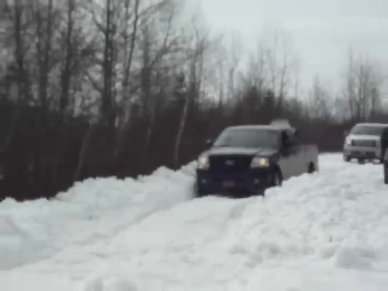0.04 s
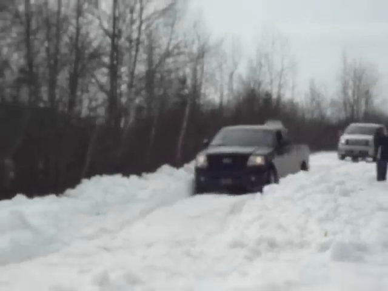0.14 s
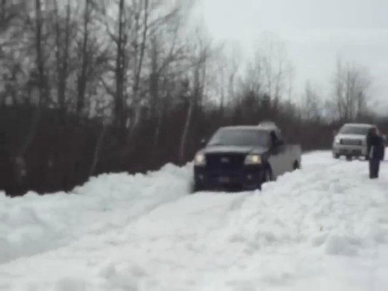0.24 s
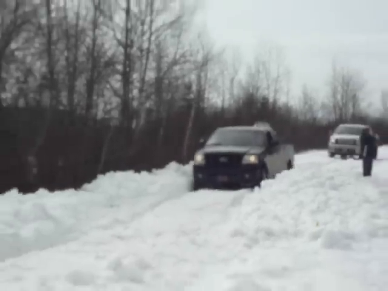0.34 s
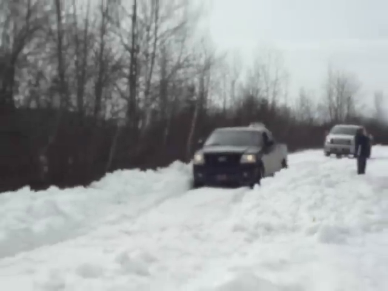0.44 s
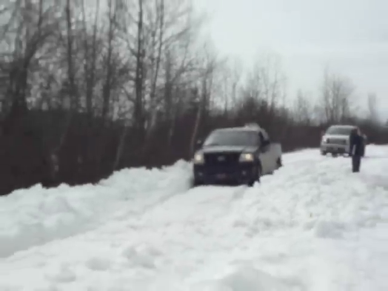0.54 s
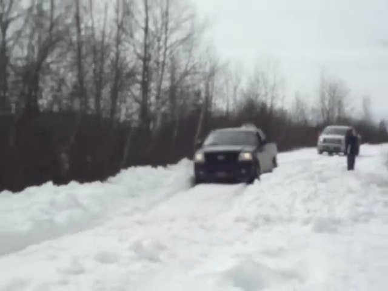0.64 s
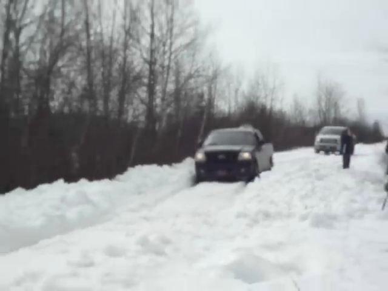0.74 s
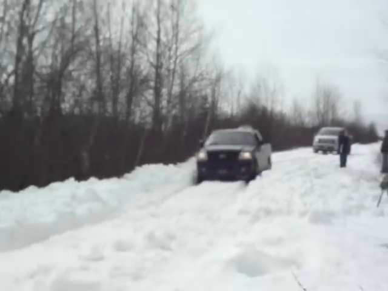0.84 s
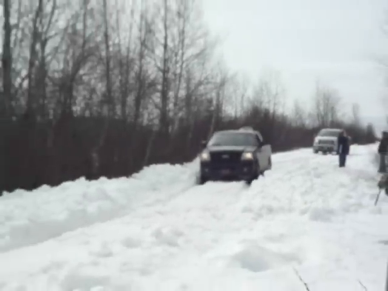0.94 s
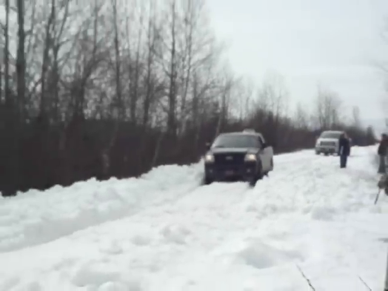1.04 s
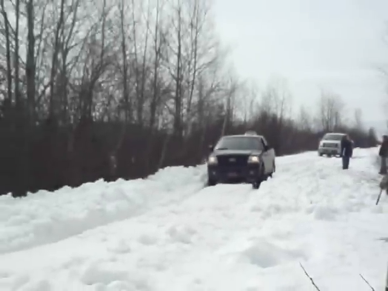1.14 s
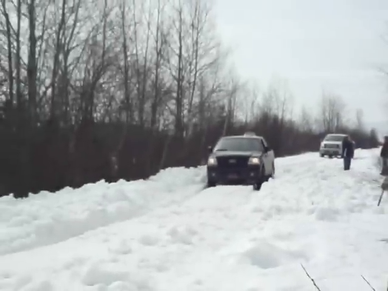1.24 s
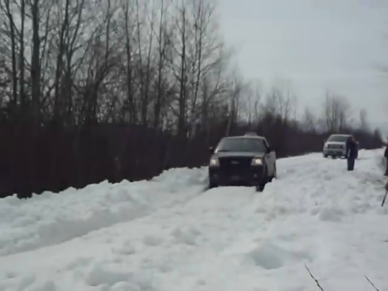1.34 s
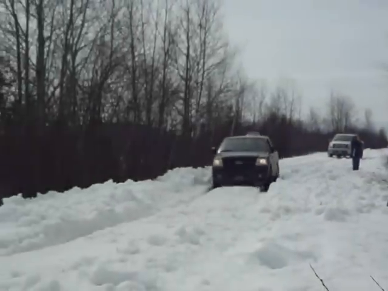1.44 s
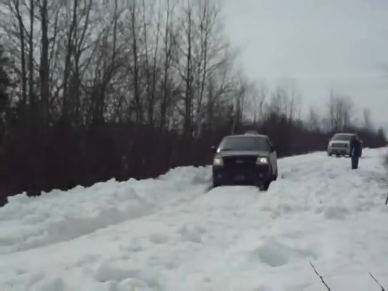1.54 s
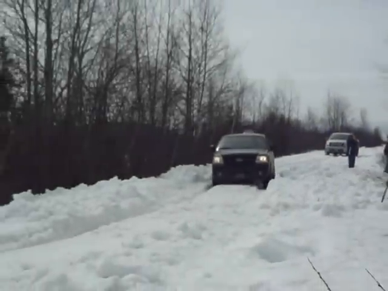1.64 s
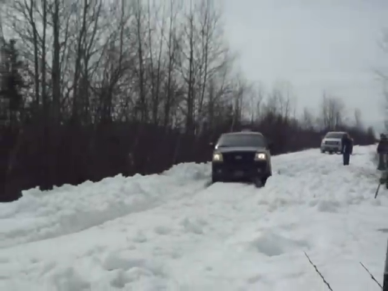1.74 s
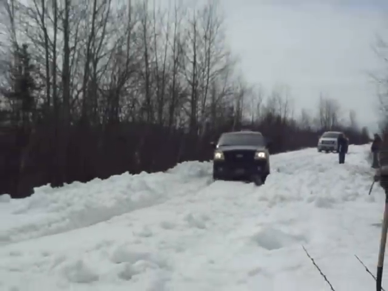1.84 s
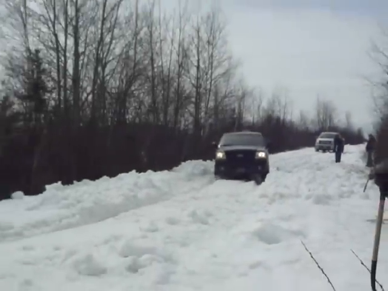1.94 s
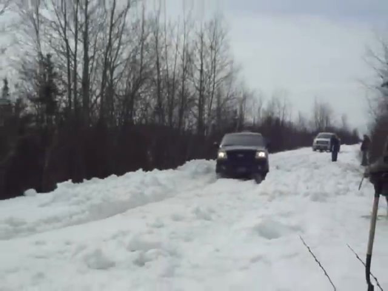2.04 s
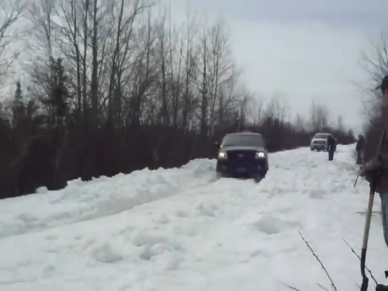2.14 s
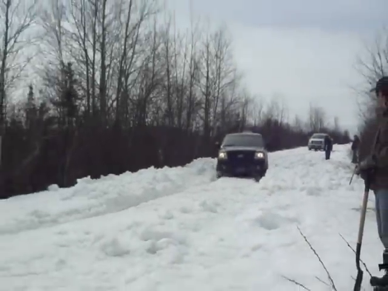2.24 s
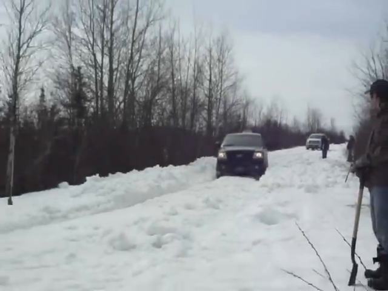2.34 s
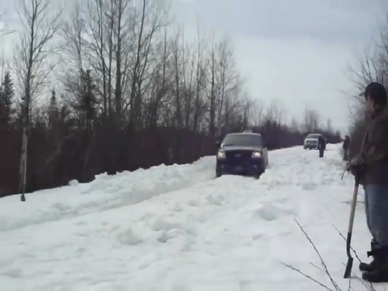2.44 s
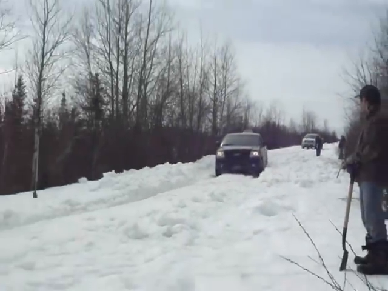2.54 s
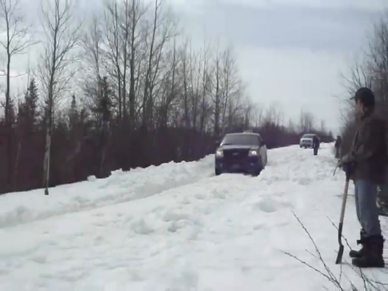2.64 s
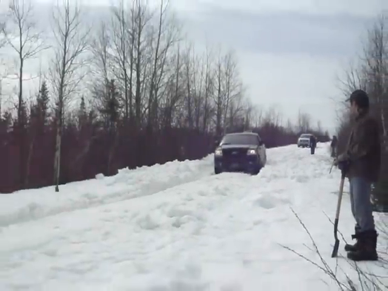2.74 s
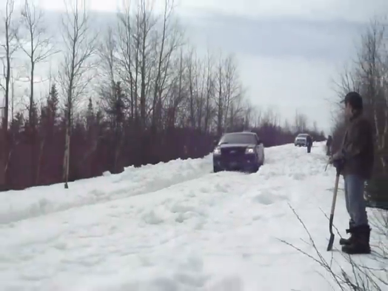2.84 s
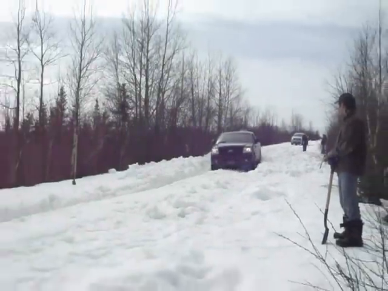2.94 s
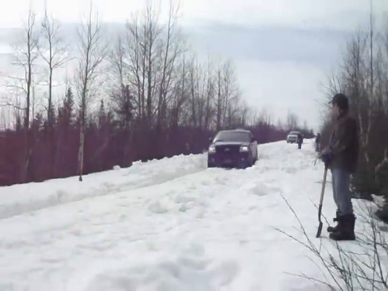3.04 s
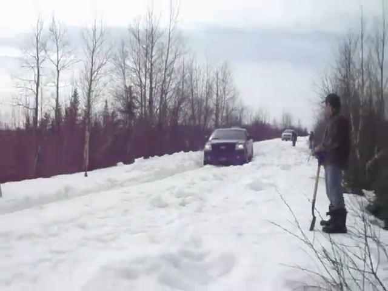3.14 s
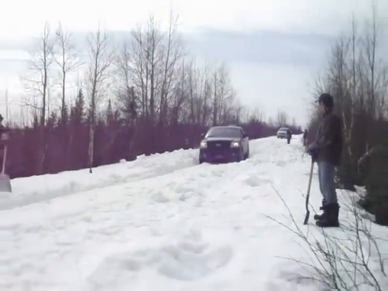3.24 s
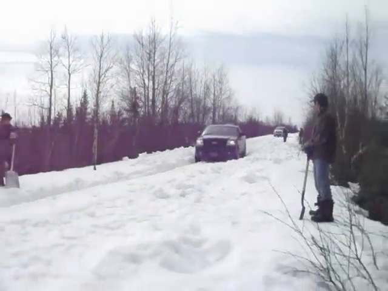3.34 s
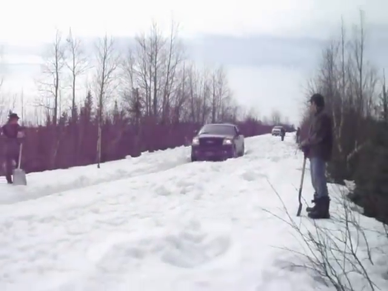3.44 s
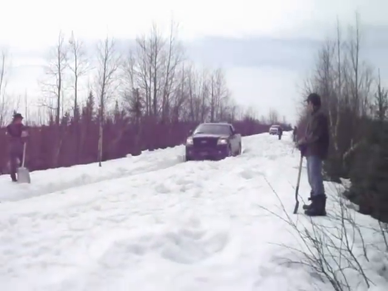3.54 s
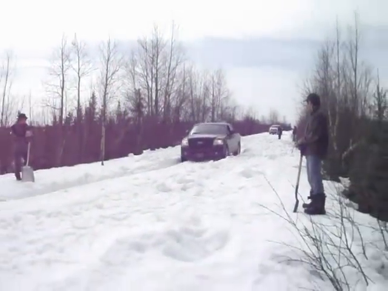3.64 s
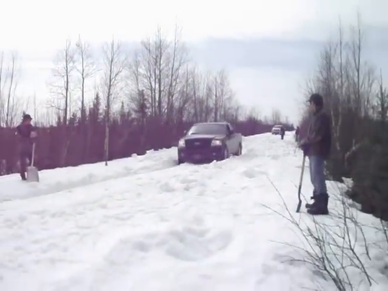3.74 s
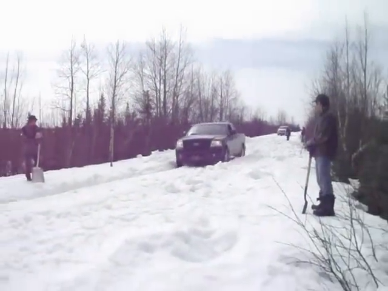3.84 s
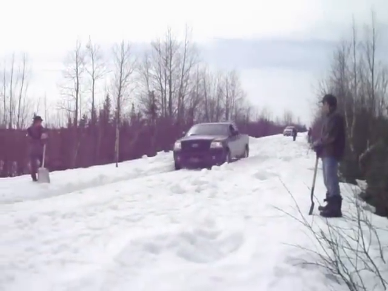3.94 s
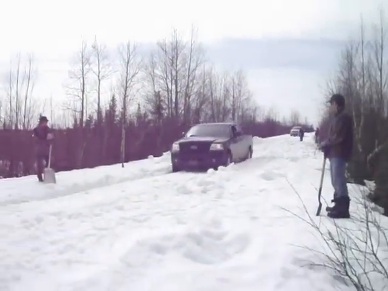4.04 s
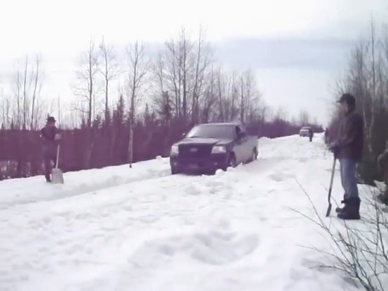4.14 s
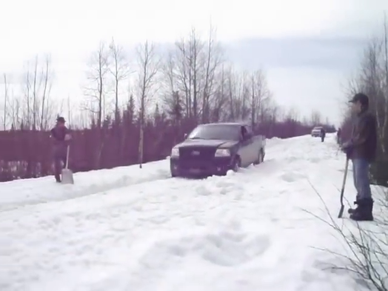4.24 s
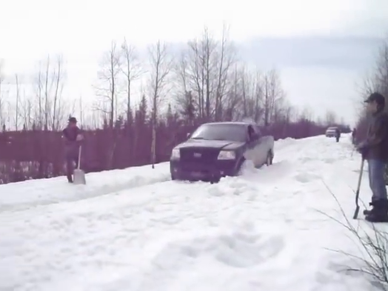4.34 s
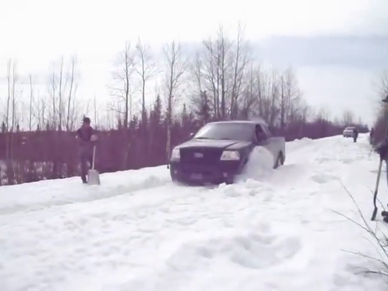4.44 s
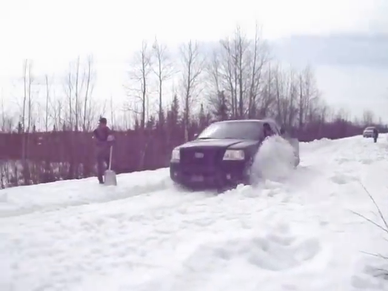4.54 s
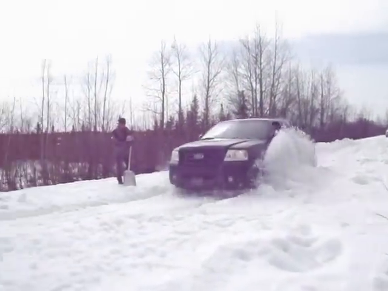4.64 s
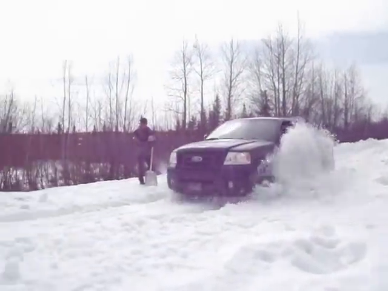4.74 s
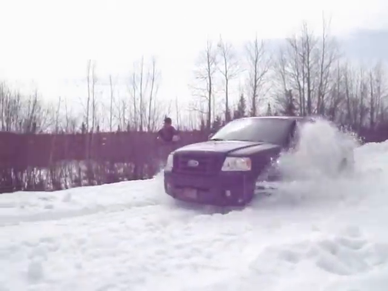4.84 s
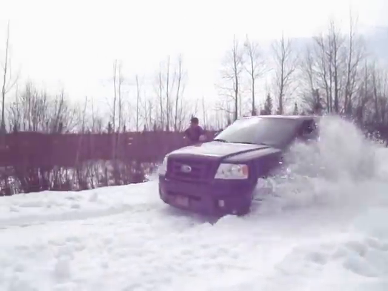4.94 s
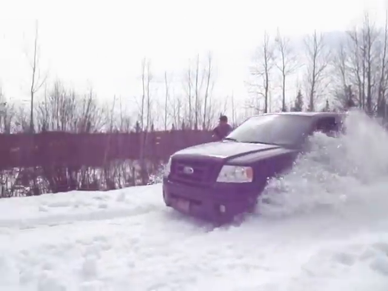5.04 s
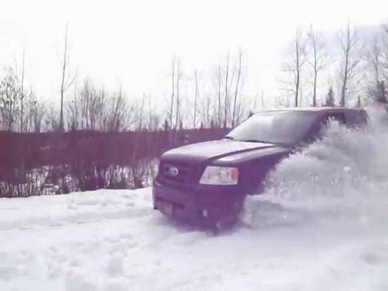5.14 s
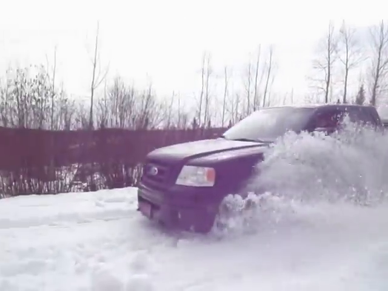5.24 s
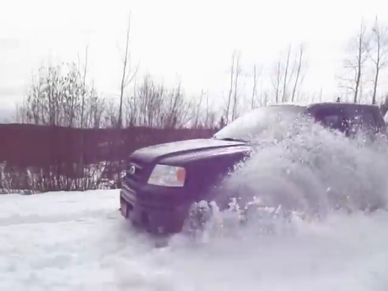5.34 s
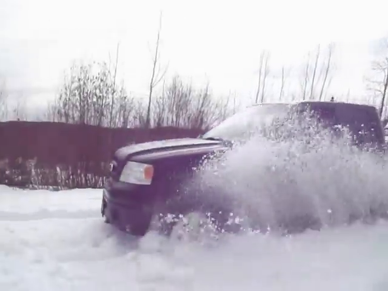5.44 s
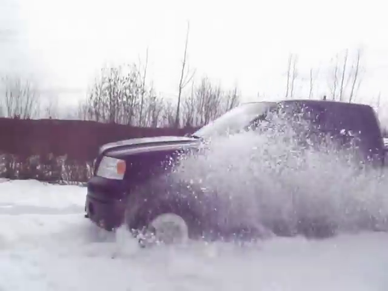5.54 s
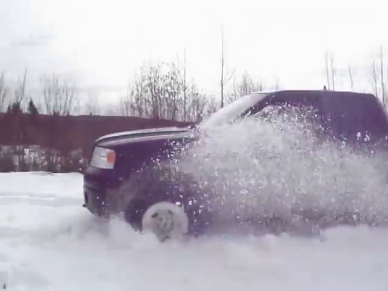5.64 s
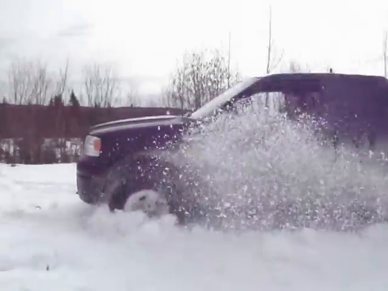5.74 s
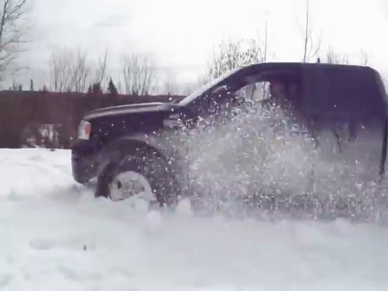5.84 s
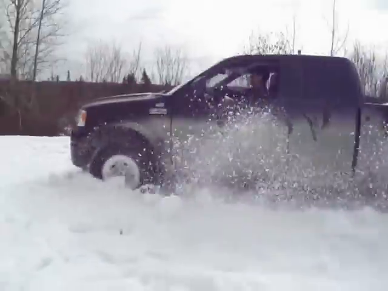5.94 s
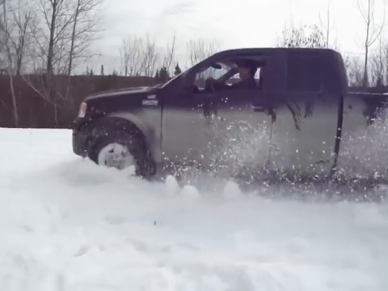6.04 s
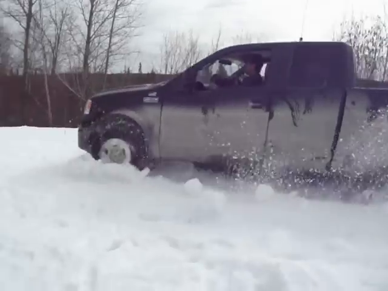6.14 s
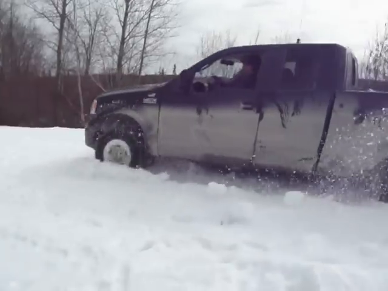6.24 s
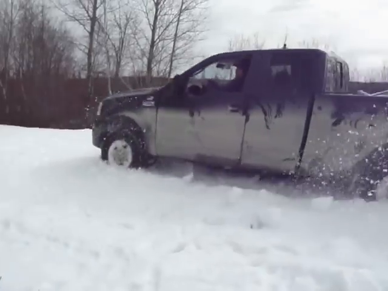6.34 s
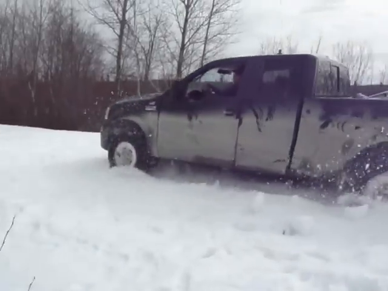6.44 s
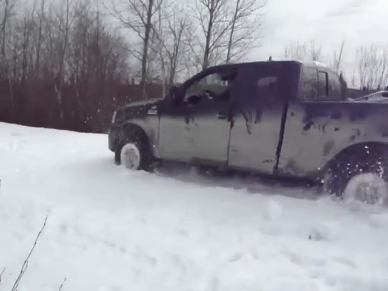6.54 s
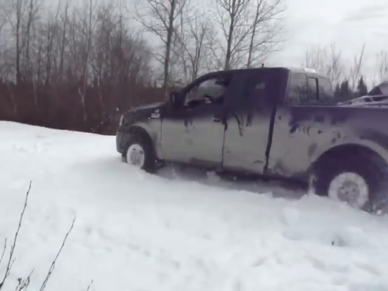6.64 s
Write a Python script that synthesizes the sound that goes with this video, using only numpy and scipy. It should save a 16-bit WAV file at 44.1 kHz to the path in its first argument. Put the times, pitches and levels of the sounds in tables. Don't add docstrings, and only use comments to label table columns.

```python
import sys
import numpy as np
from scipy import signal
from scipy.fft import rfft, irfft
from scipy.io import wavfile
from scipy.ndimage import uniform_filter1d

SR = 44100
rng = np.random.default_rng(int(sys.argv[2]) if len(sys.argv) > 2 else 0)


def gain_from_decibels(decibels):
    exponent = np.asarray(decibels, float) / 20
    return 10 ** exponent


def wav_out(sig):
    wavfile.write(sys.argv[1], SR, np.round(np.clip(np.atleast_2d(sig).T, -1, 1) * 32767).astype(np.int16))


N = 295470


def rms_one(x):
    return x / np.sqrt(np.mean(x ** 2) + 1e-20)


def in_time(rows):
    s, value = np.transpose(rows)
    return np.interp(np.arange(N) / SR, s, value)


def ramp(start_s, full_s):
    return np.clip((np.arange(N) / SR - start_s) / (full_s - start_s), 0, 1)


def drift(rate_hz):
    coarse = 40
    r = np.exp(-2 * coarse * np.pi * rate_hz / SR)
    noise = rng.standard_normal(N // coarse + 2002)
    slow = signal.lfilter([1], [1, -2 * r, r * r], noise)[2000:]
    return np.interp(np.arange(N) / coarse, np.arange(len(slow)), rms_one(slow - slow.mean()))


def coloured(spectrum, patchy_db, patch_rate):
    hz, db = np.transpose(spectrum)
    bins = np.maximum(np.arange(N // 2 + 1) * SR / N, 1)
    gain_db = np.interp(np.log(bins), np.log(hz), db, left=-90, right=-90)
    shaped = rfft(rng.standard_normal(N)) * gain_from_decibels(gain_db)
    place = 3 * np.log2(bins / hz[0])
    together = drift(patch_rate)
    out = 0
    for k in range(int(3 * np.log2(hz[-1] / hz[0])) + 2):
        band = irfft(shaped * np.maximum(1 - abs(place - k), 0), N)
        out = out + band * gain_from_decibels(patchy_db * (together + drift(patch_rate)))
    return rms_one(out)


def resonance(x, hz, width_hz):
    r = np.exp(-np.pi * width_hz / SR)
    poles = [1, -2 * r * np.cos(2 * np.pi * hz / SR), r * r]
    return signal.lfilter([(1 - r * r) / 2, 0, (r * r - 1) / 2], poles, x + 1e-18)


def picked_out(x, hz, width_hz):
    return rms_one(resonance(resonance(x, hz, width_hz), hz, width_hz))


def whistles(bands, sway_db):
    out = 0
    for hz, width, db in bands:
        out = out + gain_from_decibels(db + sway_db * drift(1.8)) * picked_out(rng.standard_normal(N), hz, width)
    return out


def crankshaft():
    # (time [s], firing rate [Hz])
    firing = [(0, 117.6), (.25, 123.1), (.55, 122.7), (1.0, 133.1), (1.7, 140.4), (2.0, 146), (2.25, 142.2),
              (2.75, 147.4), (3.25, 153.3), (3.75, 160.5), (4.0, 169.7), (4.25, 172), (4.5, 178.8),
              (4.75, 182.1), (5.5, 180.1), (5.75, 172.9), (6.25, 164.2), (6.7, 162.8)]
    return np.cumsum(in_time(firing) * (1 + .002 * drift(5.0))) / 4 / SR


def firing_tone(shaft, near_db):
    at_s, half_s = 5.6, .25
    broadside = ramp(at_s - half_s, at_s) - ramp(at_s, at_s + half_s)
    level_db = -47.5 + .91 * near_db + 3.1 * broadside
    return np.sqrt(2) * gain_from_decibels(level_db + 1.4 * drift(5.0)) * np.sin(8 * np.pi * shaft)


def tailpipe():
    return 4.1 * ramp(5.77, 6.15)


def exhaust_orders(shaft, near_db, tail_db):
    # (centre [Hz], width [Hz], level [dB], share of tailpipe gain [1])
    pipe = [(107.7, 6, -0.5, 4), (207.2, 25, 3.5, 0.5), (242.4, 20, 0.5, -0.5), (302, 20, 1.5, 1.0),
            (601, 45, -6.5, 0.5), (740, 75, -7, 0), (884.5, 37, -3, -4.5), (1060, 52, -3, 0.5)]
    cycle = np.diff(np.floor(shaft / 2), prepend=0)
    out = np.zeros(N)
    for hz, width, db, share in pipe:
        level_db = -58 + .96 * near_db + db + share * tail_db + 3.4 * drift(2.5)
        out += gain_from_decibels(level_db) * picked_out(cycle, hz, width)
    return out


def bark(shaft):
    fired = np.flatnonzero(np.diff(np.floor(4 * shaft)))
    cylinder = gain_from_decibels(3.7 * rng.standard_normal(8))[np.arange(len(fired)) % 8]
    pulses = np.zeros(N)
    pulses[fired] = cylinder * gain_from_decibels(3.2 * rng.standard_normal(len(fired)))
    return picked_out(pulses, 650, 500)


def intake(shaft, near_db):
    # (centre [Hz], width [Hz], level [dB], +1 whole or -1 half orders)
    ducts = [(487, 34, -50, 1), (592, 36, -52, -1), (672, 40, -54, 1), (750, 45, -57, -1)]
    turn = np.floor(shaft)
    pulses = np.diff(turn, prepend=0)
    rung = np.zeros(N)
    for hz, width, db, sign in ducts:
        rung += gain_from_decibels(db + 1.7 * drift(2.5)) * picked_out(pulses * sign ** turn, hz, width)
    facing = ramp(2.1, 2.7) - ramp(4.0, 4.6)
    off_axis_loss_db = 14
    return gain_from_decibels(.6 * (near_db - 5.5) + off_axis_loss_db * (facing - 1)) * rung


def rumble(near_db, tail_db):
    # (frequency [Hz], density [dB per Hz])
    spectrum = [(50, -17), (75, -0.5), (150, -7), (300, -9), (380, -21.5), (500, -47)]
    return gain_from_decibels(-45.5 + .94 * near_db + tail_db) * coloured(spectrum, patchy_db=0.5, patch_rate=5.0)


def roar(shaft, near_db):
    # (frequency [Hz], density [dB per Hz])
    spectrum = [(250, -17), (350, 1.5), (480, -1), (700, 0.5), (1000, 3.5), (1300, -9), (1700, -42.5)]
    noise = coloured(spectrum, patchy_db=-0.5, patch_rate=1.4)
    return gain_from_decibels(-48 + .99 * near_db) * (noise + gain_from_decibels(-9.5) * bark(shaft))


def snow_spray(near_db):
    # (frequency [Hz], density [dB per Hz])
    spectrum = [(800, -47), (1140, -6.5), (1600, -7), (2850, -1.5), (3320, -8), (4450, -25.5),
                (5780, -47.5), (9790, -120)]
    # (centre [Hz], width [Hz], level under the spray [dB])
    fan = [(1944, 350, -17.5), (2810, 300, -10.5)]
    plume_db = 3.7 * (ramp(4.17, 4.66) - ramp(5.6, 6.05))
    hiss = coloured(spectrum, patchy_db=0.6, patch_rate=6.8)
    return gain_from_decibels(-35.5 + .69 * near_db + plume_db) * (hiss + dull(whistles(fan, sway_db=.6)))


def dull(x):
    return signal.sosfilt(signal.butter(4, 3200, fs=SR, output="sos"), x)


def shell(x):
    # (centre [Hz], width [Hz], level [dB])
    modes = [(960, 55, -20.5), (1257, 180, -14.5), (1535, 122, -4.5), (2002, 238, -2.5), (2404, 100, -1),
             (2686, 176, -2), (3230, 280, -9), (4405, 370, -14)]
    rung = 0
    for k, (hz, width, db) in enumerate(modes):
        rung = rung + (-1) ** k * gain_from_decibels(db) * resonance(x, hz, width)
    return dull(rung)


def clicks(rows, t60, body_db, bounce_db):
    out, age = np.zeros(N + 2048), np.arange(1024) / SR
    rise = 1 - np.exp(-age / .00015)
    body = gain_from_decibels(body_db - 60 * age / 0.0052) * np.sin(2 * np.pi * 1450 * age)
    lag = round(.0016 * SR)
    bass_cut = signal.butter(3, 935, "high", fs=SR, output="sos")
    for s, peak_db, hz in rows:
        ring = gain_from_decibels(-60 * age / t60) * np.sin(2 * np.pi * hz * age)
        pulse = signal.sosfilt(bass_cut, dull(rise * (body + ring)))
        pulse *= -gain_from_decibels(peak_db) / abs(pulse).max()
        at = round(s * SR) - abs(pulse).argmax() - 6
        out[at:at + 1024] += pulse
        out[at + lag:at + lag + 1024] += gain_from_decibels(bounce_db) * pulse
    return out[:N]


def ice_hits():
    # (time [s], peak level [dB], pitch [Hz])
    hits = [
        (4.7509, -9, 2050),
        (5.2869, -1.2, 2570),
        (5.8708, 2.5, 2570),
        (5.8783, 1, 2400),
        (5.8854, .5, 2660),
        (5.8934, 1, 2700),
        (5.9044, -3, 2800),
    ]
    return clicks(hits, t60=0.004, body_db=-13, bounce_db=-12)


def lens_motor():
    # (time [s], mesh rate [teeth per s])
    gear = [(0, 204), (1, 204), (1.6, 202), (2, 195), (2.2, 197), (2.5, 205), (4, 202)]
    # (start [s], stop [s], level [dB])
    runs = [
        (-.1, 1.016, -24.5),
        (1.54, 3.936, -25.5),
    ]
    idle_db, spin_s = -41, 0.036
    level_db = idle_db
    for start, stop, db in runs:
        running = ramp(start, start + spin_s) - ramp(stop - spin_s, stop)
        level_db = level_db + (db - idle_db) * running
    teeth = np.cumsum(in_time(gear) * (1 + .02 * drift(20.0))) / SR
    struck = np.diff(np.floor(2 * teeth), prepend=0) > 0
    weak_db = np.where(teeth % 1 > .5, -8.0, 0)
    ticks = struck * gain_from_decibels(weak_db + 2.5 * rng.standard_normal(N)) * rng.choice([-1, 1], N)
    scrape = rng.standard_normal(N) * (.7 + np.exp(-(teeth % 1) / .3))
    whir = rms_one(shell(scrape)) + gain_from_decibels(-4.0) * rms_one(shell(ticks))
    return gain_from_decibels(level_db + .5 * drift(5.4)) * rms_one(whir)


def lever():
    # (time [s], peak level [dB], pitch [Hz])
    catch = [(1.0827, -7, 2500), (1.0947, -4.5, 1481), (1.5071, -3, 2230), (1.524, -3, 2110),
             (1.5248, 3.5, 2030), (1.5397, -2, 2060), (1.5413, -12, 1894), (4.0017, -2, 2700),
             (4.0072, -3, 2550), (4.0147, -2.5, 2385), (4.0188, -1, 1696), (4.0198, 0, 2271)]
    # (start [s], end [s], level [dB])
    scrapes = [
        (1.069, 1.093, -17),
        (1.093, 1.105, -21),
        (1.503, 1.522, -20),
        (3.999, 4.024, -19),
    ]
    wait_s, gap_s = .006, .0029
    time = np.arange(N) / SR
    push, chatter = np.zeros(N), []
    for start, end, db in scrapes:
        push += gain_from_decibels(db) * np.clip(np.minimum(time - start, end - time) / 0.0013, 0, 1)
        for k in range(8):
            if start + wait_s + gap_s * (k + 1) < end:
                u, v, w = rng.standard_normal(3)
                slip_s = start + wait_s + gap_s * (k + 0.17 * u)
                chatter.append((slip_s, db + 10.5 + 2 * v, 2500 * (1 + 0.15 * w)))
    grit = push * rms_one(shell(rng.standard_normal(N)))
    return grit + clicks(catch + chatter, t60=.009, body_db=-10.5, bounce_db=-19.5)


def gear_ticks():
    # (time [s], peak level [dB], pitch [Hz])
    ticks = [(0.8261, -10.3, 2110), (0.89, -9.2, 2360), (0.9192, -9.3, 2340), (0.9235, -2.2, 2270),
             (0.9582, -1.9, 2270), (2.6918, -5.5, 2130), (2.7358, -11.7, 2430), (2.9935, -8.0, 2250),
             (3.2014, -9.4, 2770), (3.2582, -1.2, 2420), (3.2918, -6.3, 2450)]
    return gain_from_decibels(-1.0) * clicks(ticks, t60=.0045, body_db=-6, bounce_db=-6)


def lens_standby():
    # (centre [Hz], width [Hz], level [dB])
    tones = [(2020, 130, -39), (2650, 100, -40)]
    return whistles(tones, sway_db=0.7)


def wind_buffet():
    # (time [s], level [dB])
    gusts = [(0, -47.5), (1.6, -43.5), (2.2, -40.5), (3.1, -36), (3.75, -28), (3.95, -22), (6.7, -21)]
    # (frequency [Hz], density [dB per Hz])
    spectrum = [(12, -11), (25, -9.5), (45, -6), (75, -18.5), (110, -30.5)]
    return gain_from_decibels(in_time(gusts)) * coloured(spectrum, patchy_db=-1.5, patch_rate=4.9)


def microphone_hiss():
    # (frequency [Hz], density [dB per Hz])
    spectrum = [(2500, -14.5), (3500, -5.5), (4500, -9), (5500, -12.5), (6500, -27.5), (7200, -31)]
    return gain_from_decibels(-52) * coloured(spectrum, patchy_db=0.7, patch_rate=8.0)


def scene():
    # (time [s], gain over the far level [dB])
    approach = [(0, 0), (1.3, -1), (1.8, 1.5), (2.8, 2), (3.4, 7), (3.8, 8), (4.0, 13), (4.3, 14.5),
                (4.5, 18.5), (4.9, 21.5), (5.45, 24.5), (5.95, 22.5), (6.3, 22), (6.7, 21.5)]
    near_db, tail_db, shaft = in_time(approach), tailpipe(), crankshaft()
    engine = firing_tone(shaft, near_db) + exhaust_orders(shaft, near_db, tail_db) + intake(shaft, near_db)
    truck = engine + rumble(near_db, tail_db) + roar(shaft, near_db) + snow_spray(near_db)
    camera = lens_motor() + lever() + gear_ticks() + lens_standby()
    return (truck + ice_hits() + camera + wind_buffet())[None]


def low_pass(x):
    return signal.sosfilt(signal.butter(12, 15700, fs=SR, output="sos"), x)


def record(dry):
    squared = dry ** 2
    lopsided = .07 * (squared - uniform_filter1d(squared, size=441))
    heard = dry + microphone_hiss() + lopsided
    narrow = signal.sosfilt(signal.cheby2(16, 45, 7190, fs=SR, output="sos"), heard)
    offset, ceiling = .0152, .99
    mix = np.clip(narrow + offset, -ceiling, ceiling)
    return low_pass(mix)


dry = scene()
out = record(dry)
wav_out(out)
```